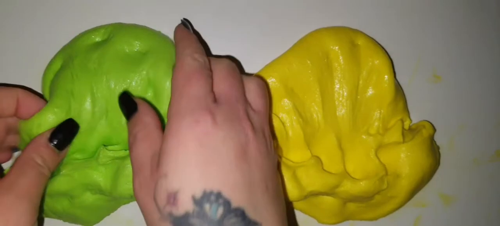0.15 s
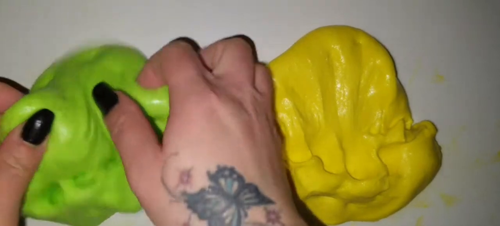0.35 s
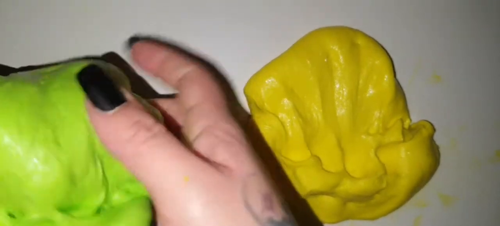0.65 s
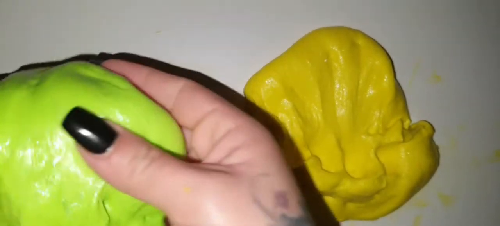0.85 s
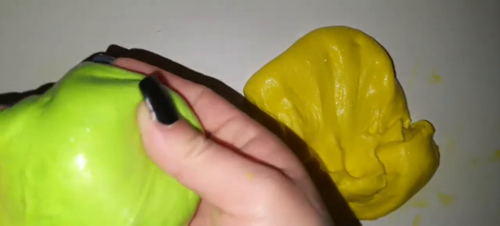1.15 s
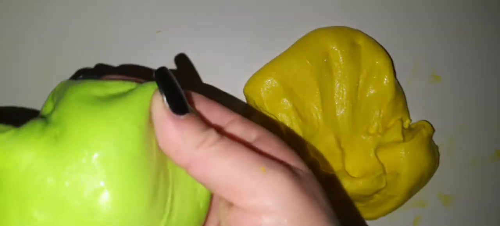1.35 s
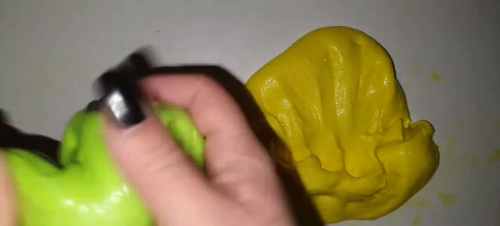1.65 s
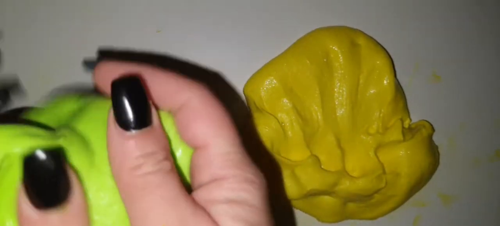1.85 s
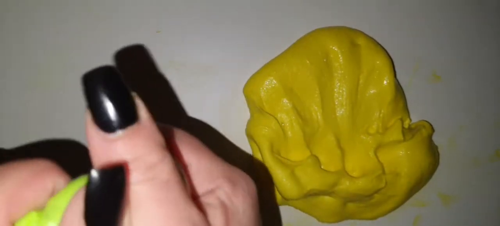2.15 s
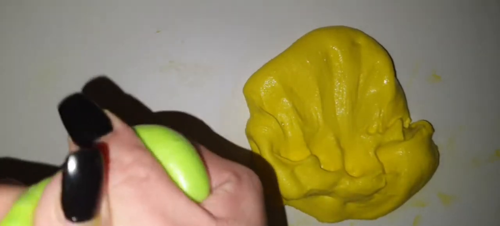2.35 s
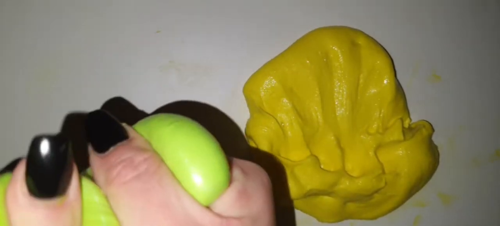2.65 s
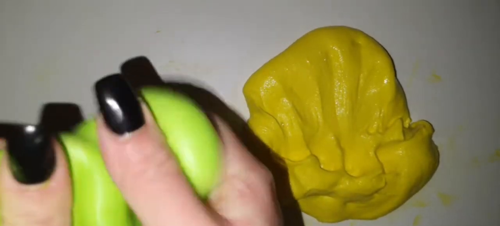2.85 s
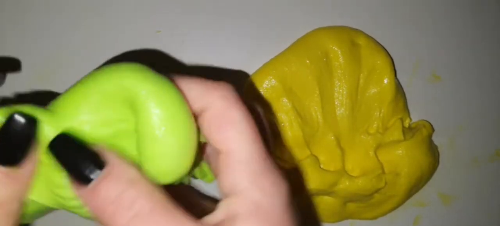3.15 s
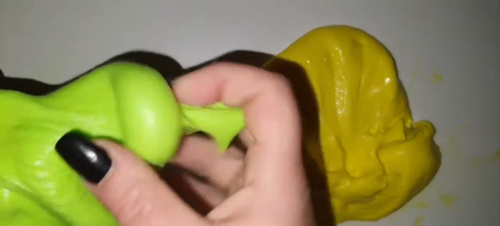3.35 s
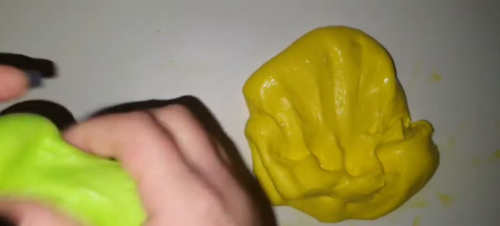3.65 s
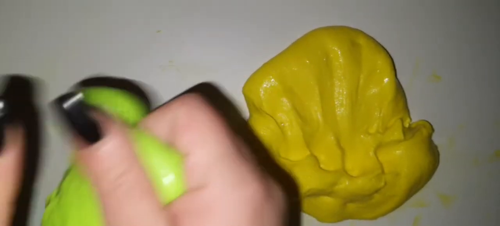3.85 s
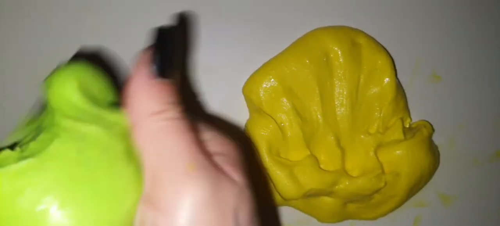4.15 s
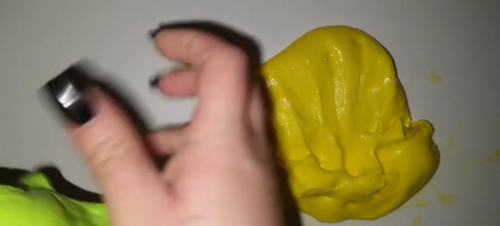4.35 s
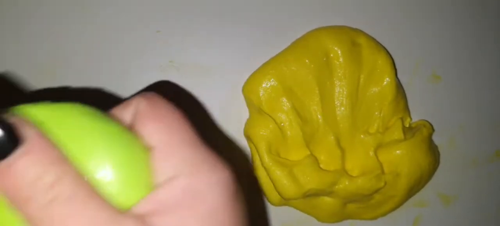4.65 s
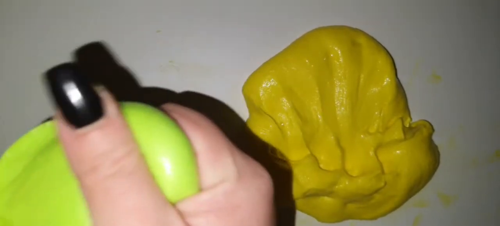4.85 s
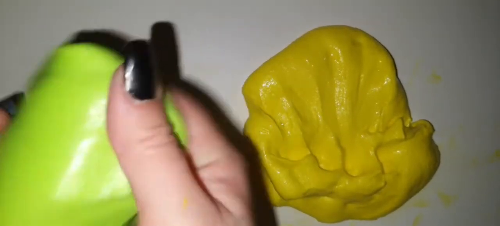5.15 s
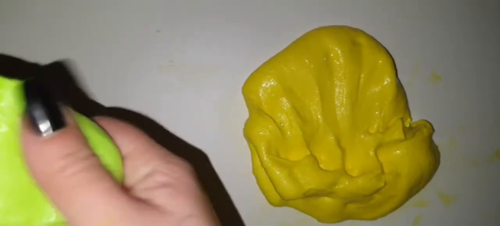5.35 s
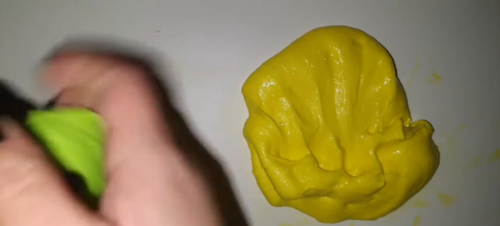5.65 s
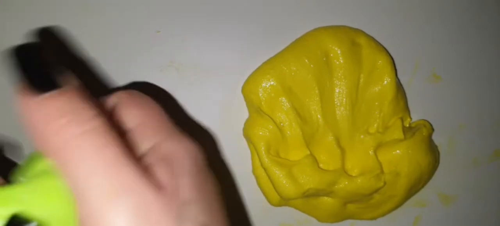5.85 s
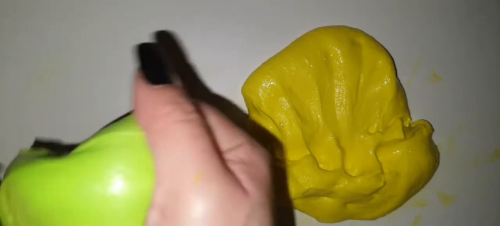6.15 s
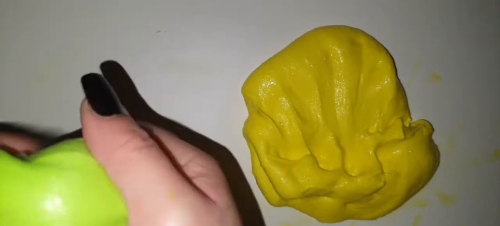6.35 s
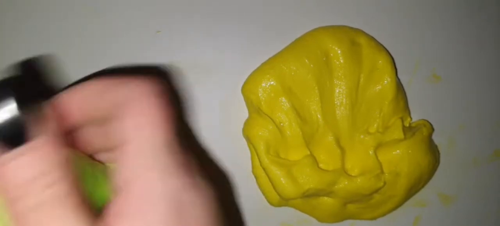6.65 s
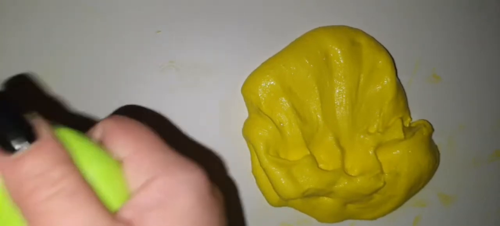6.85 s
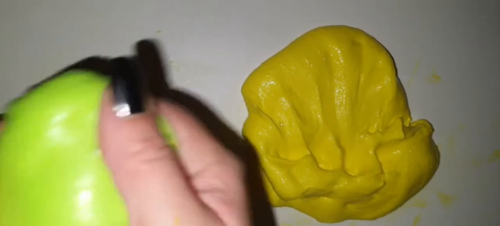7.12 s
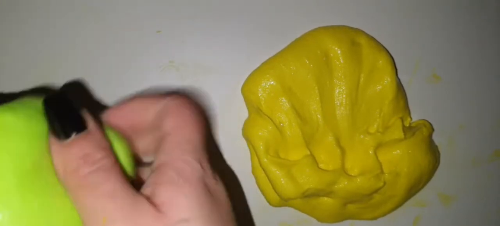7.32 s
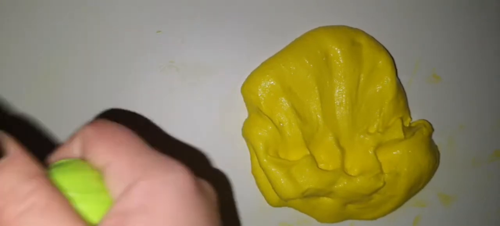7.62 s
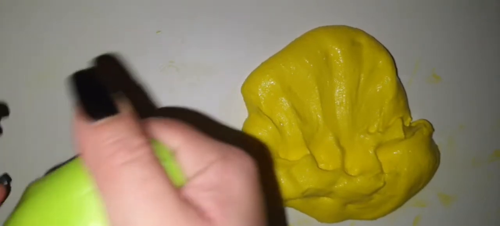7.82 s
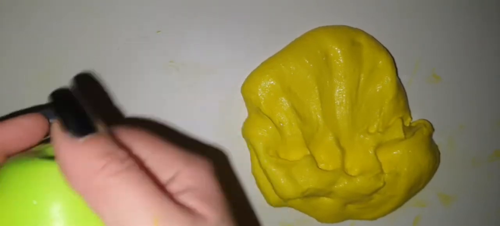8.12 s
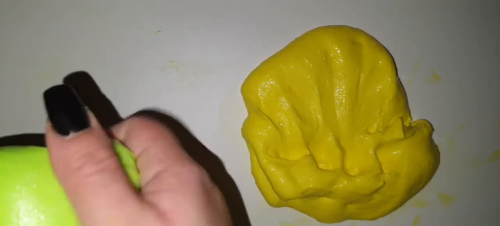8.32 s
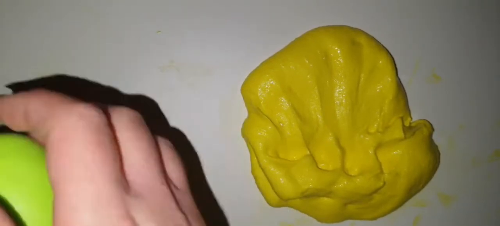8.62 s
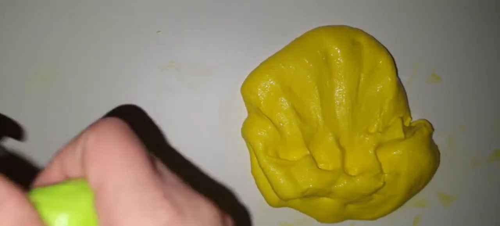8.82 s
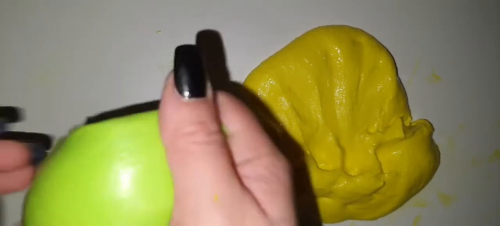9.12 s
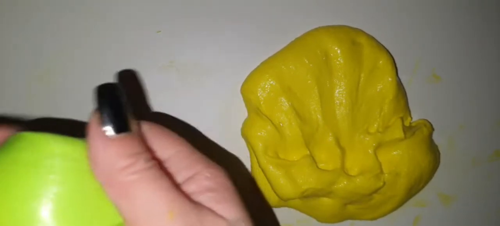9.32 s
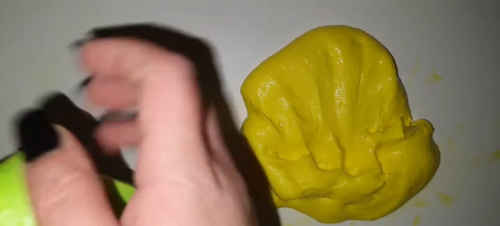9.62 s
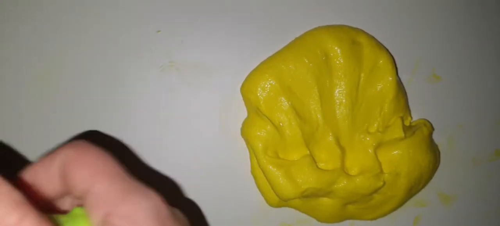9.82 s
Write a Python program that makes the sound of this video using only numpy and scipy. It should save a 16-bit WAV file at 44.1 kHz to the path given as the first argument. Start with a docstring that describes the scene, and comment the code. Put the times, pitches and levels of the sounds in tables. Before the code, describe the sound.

Hands knead a lump of dried slime up close: opening scuffs, soft hissing rubs, squishy squeezes, and a sharp burst of loud pops.

```python
"""A lump of dried slime scuffs and thuds over a table top, then two hands knead it.
The place is a quiet room, with a pair of microphones close to the hands, the left one nearer.
Each stroke swells and lets go: shaped friction noise makes the scuff, hiss, squish and cupped hollow.
Light rubs hiss through a closing gap between skin and slime; squeezes also squish and sound the hollow.
Trapped air leaves in sharp pops (noise flurries) and dull plops (sagging tones)."""
import sys
import numpy as np
from scipy import signal
from scipy.fft import rfft, irfft
from scipy.io import wavfile
from scipy.ndimage import uniform_filter1d

SR = 44100
rng = np.random.default_rng(int(sys.argv[2]) if len(sys.argv) > 2 else 0)


def store_wav(level_fs):
    """Save 16-bit WAV to argv[1]."""
    pcm = np.round(np.clip(np.atleast_2d(level_fs), -1, 1) * 32767)
    wavfile.write(sys.argv[1], SR, pcm.T.astype(np.int16))


N = 440114

# Low room rumble and microphone hiss: freq_hz, level_db_per_hz (relative)
AIR_COLOUR = [(10, -32), (28, -22.5), (62, -1), (92, 1.5), (190, -11), (380, -14.5), (750, -26.5),
              (4000, -33), (13000, -25.5), (16000, -38)]
# Decay of the room: freq_hz, t60_s
ROOM_DECAY = [(250, 0.25), (1800, 0.17), (8000, 0.27)]
# Thud of the table top: freq_hz, level_db_per_hz (relative)
THUD_COLOUR = [(15, -14), (40, -9), (75, 3), (130, -10), (300, -26), (1000, -70)]
# Lump scuffing over the table: freq_hz, level_db_per_hz (relative)
SCUFF_COLOUR = [(25, -21), (80, 1), (230, -11.5), (500, -4), (750, -10.5), (1150, 1.5), (1500, -6),
                (3000, -4.5), (4500, -7), (16000, -17.5)]
# Skin sliding over the slime: freq_hz, level_db_per_hz (relative)
SLIDE_COLOUR = [(2500, -6), (8000, -4), (10000, -3.5), (13000, 1.5), (16000, -0.3)]
# Squeezed slime: freq_hz, level_db_per_hz (relative)
SQUISH_COLOUR = [(120, -19), (600, -2), (850, -4), (1150, -5), (1900, -4), (2700, -7.5), (4000, -13.5),
                 (16000, -23.5)]
# Air in the cupped hands: freq_hz, level_db_per_hz (relative)
HOLLOW_COLOUR = [(40, -18), (210, -12.5), (290, -2.5), (335, 2.5), (400, -3.5), (500, -7.5), (850, -32.5),
                 (2000, -65.5)]
# Tearing skin of a pop: freq_hz, level_db_per_hz (relative)
SNAP_COLOUR = [(100, -32), (400, -3.5), (750, -15), (1250, -14), (1800, -5.5), (4000, -8.5), (9000, -11),
               (16000, -7.5)]

# Shoves of the lump over the table: peak_s, rise_s, fall_s, scuff_db, thud_db (before the stereo tilt)
SHOVES = [(0.103, 0.029, 0.042, -43.5, -52), (0.176, 0.051, 0.026, -44, -70), (.27, .05, 0.076, -60.5, -73),
          (.37, 0.043, 0.077, -50, -78), (.425, 0.023, 0.023, -42.5, -78)]
# Deep pockets collapsing: start_s, peak_db (before the bass cut and layer trim), settled_pitch_hz, swelling_s
PLOPS = [(2.2822, -12, 344, 0.0018), (2.382, -23, 301, 0.0057), (3.755, -28.5, 359, 0.00061),
         (4.328, -31, 490, 0.0011), (4.588, -33, 290, 0.0015), (4.675, -26, 291, 0.0014),
         (4.751, -29.5, 297, 0.00089), (4.782, -21.5, 297, 0.00073), (5.376, -31, 351, 0.0016),
         (5.398, -32.5, 384, 0.0025), (5.935, -28, 321, 0.0017), (6.415, -26.5, 317.4, 0.0049),
         (6.467, -28, 299, 0.0021), (6.886, -32.5, 373, 0.0024), (6.966, -42, 310, 0.0032),
         (8.372, -36.5, 350, 0.0027), (8.392, -29.5, 284, 0.0027), (9.453, -41, 383, 0.0025),
         (9.915, -27, 292, 0.0054)]
# Air pockets bursting through the dry skin:
# burst_s, level_db (rms over 20 ms), tearing_s, pitch_hz, left_minus_right_db (added to the chance spread)
POPS = [(0.0678, -48.5, 0.0018, 4640, -2), (.985, -64, 0.00095, 6200, 0), (1.967, -50, 0.00032, 9400, -1),
        (2.002, -54, 0.0014, 9000, 0), (2.0397, -41, 0.0022, 9000, 2), (2.068, -46.5, 0.00036, 13200, 5),
        (2.111, -48.5, 0.00049, 6840, 15), (2.1953, -44, 0.0019, 3160, -1.5),
        (2.231, -47, 0.0011, 13000, 0), (2.2567, -29.5, 0.00011, 10700, 10),
        (2.3047, -41.5, 0.0014, 12400, -4), (2.3197, -39, .0008, 13000, 2), (2.348, -42, 0.0017, 9000, 0),
        (2.3608, -46.5, 0.000042, 10400, 11), (2.372, -39, 0.00021, 9800, 17),
        (2.3811, -23.5, 0.0021, 4180, 0.5), (2.4004, -38, 0.002, 1690, 2),
        (2.4284, -20.5, 0.001, 6300, -1.5), (2.4349, -36, .0014, 6400, 12),
        (2.4804, -32, 0.00047, 3070, -1), (2.5175, -40.5, 0.0021, 7340, 4),
        (3.1393, -50.5, 0.0013, 8600, 4.5), (3.619, -44, 0.00043, 11130, 8), (3.78, -42, 0.0009, 13040, -3),
        (4.2715, -42.5, 0.00087, 12600, 0), (4.333, -39.5, 0.0014, 13500, -1),
        (4.4143, -49, 0.0015, 13000, 2), (4.668, -50, 0.00079, 2500, 2), (4.7514, -40, 0.0019, 3650, 3),
        (4.7829, -26, 0.001, 1450, 3.5), (5.266, -50, 0.001, 11100, -4), (5.2986, -50.5, 0.0017, 1580, 4),
        (5.301, -50, .0006, 13500, 0), (5.33, -45.5, 0.0015, 5870, -1), (5.365, -45.5, 0.0013, 14000, 7),
        (5.5723, -56.5, 0.0021, 12300, 12), (5.6133, -50.5, 0.00081, 9800, -1),
        (5.8303, -50.5, 0.001, 13400, 6), (5.9487, -42.5, 0.0019, 6460, 2),
        (6.89, -45.5, 0.00089, 14100, -7), (6.916, -41.5, 0.00053, 1400, 2),
        (7.2043, -48, 0.00066, 14200, 0), (7.2053, -56, 0.0011, 2600, 0), (7.272, -54.5, 0.0011, 6900, 2),
        (7.3931, -39.5, 0.0023, 5900, 3), (7.5717, -54.5, 0.00047, 11000, 4),
        (7.711, -42.5, 0.0014, 13900, 4), (7.906, -46, 0.0021, 11370, 0.5),
        (8.182, -57.5, 0.00045, 11000, -5), (8.246, -38, 0.00085, 14000, -4),
        (8.3592, -42, 0.00094, 8950, -7), (8.8645, -58, 0.0013, 6070, 4),
        (9.3317, -57.5, 0.00069, 12000, 2), (9.456, -53, .0008, 8960, 1), (9.789, -63, 0.0012, 7900, 7)]
# Squeezes: peak_s, rise_s, fall_s, sliding_db, squish_db, hollow_db (before the layer trims)
SQUEEZES = [(.955, .03, 0.038, -75, -70, -77), (1.63, 0.051, 0.025, -60.5, -63.5, -75),
            (1.769, 0.034, 0.09, -52, -58, -73.5), (2.09, .035, 0.057, -52.5, -70, -63),
            (2.3, 0.058, 0.036, -45.5, -53, -46), (2.44, .06, 0.088, -52.5, -51, -48),
            (2.621, 0.06, 0.019, -52.5, -63.5, -84), (2.871, 0.034, 0.052, -42, -50.5, -48),
            (2.97, 0.084, 0.046, -46.5, -51.5, -55), (3.034, 0.016, 0.02, -60.5, -64.5, -49),
            (3.37, 0.039, .08, -70, -74, -73.5), (3.783, 0.047, 0.038, -46, -48.5, -44),
            (4.33, 0.042, 0.047, -46.5, -48, -52), (4.59, 0.019, 0.021, -47, -52.5, -48.5),
            (4.679, 0.037, 0.061, -47, -59.5, -47.5), (4.801, .04, 0.046, -45.5, -52, -48.5),
            (5.05, .035, 0.059, -50.5, -68.5, -58.5), (5.321, 0.044, 0.069, -50.5, -65, -60.5),
            (5.39, 0.017, 0.032, -51, -60, -47.5), (5.463, .04, 0.031, -48, -49, -46),
            (5.94, 0.056, 0.069, -45.5, -61.5, -46), (6.135, 0.027, .022, -57.5, -66.5, -68),
            (6.279, .03, 0.034, -55.5, -73, -59.5), (6.345, 0.031, 0.012, -82, -95, -57.5),
            (6.418, .035, 0.021, -52.5, -61, -49), (6.49, .025, 0.026, -43, -51, -44),
            (6.771, 0.017, 0.026, -55, -60.5, -54.5), (6.911, .045, 0.031, -42.5, -53, -47.5),
            (6.971, 0.022, 0.013, -49.5, -54.5, -42.5), (7.17, 0.054, 0.045, -73, -89, -66),
            (7.321, 0.051, 0.027, -51, -54, -47.5), (7.407, 0.024, 0.022, -51.5, -65, -53.5),
            (7.521, 0.046, .03, -57, -70, -58), (7.63, 0.018, 0.043, -74, -93, -63),
            (7.702, .025, 0.045, -48.5, -61.5, -52), (7.79, .035, 0.05, -56, -64.5, -70.5),
            (8.258, 0.019, 0.035, -59, -60.5, -58.5), (8.387, 0.035, 0.037, -50.5, -52.5, -42),
            (8.71, 0.026, 0.076, -58.5, -82.5, -62), (8.918, .042, 0.028, -51.5, -57, -52),
            (9.21, 0.0257, 0.033, -66.5, -66.5, -70), (9.465, 0.033, 0.048, -50.5, -54.5, -45),
            (9.61, 0.028, 0.052, -58.5, -73, -57), (9.926, .031, 0.031, -45.5, -52.5, -49)]
# Light rubs of the fingers: peak_s, rise_s, fall_s, sliding_db (before the layer trim), gap_resonance_hz
RUBS = [(.433, .017, .015, -45, 4960), (.54, .05, .07, -68.5, 4570), (.72, 0.029, .03, -61, 5000),
        (0.809, 0.044, 0.027, -61, 5500), (.97, .05, 0.04, -61, 5490), (1.555, 0.047, 0.067, -58, 5200),
        (1.63, .03, 0.028, -55.5, 5100), (1.97, 0.15, 0.26, -58, 2987), (2.58, .06, 0.071, -57, 3940),
        (3.22, 0.12, 0.16, -70.5, 4000), (3.353, 0.053, 0.091, -58.5, 4760), (3.65, 0.19, .06, -60.5, 3920),
        (4., .08, .08, -68.5, 5340), (4.25, .1, .11, -54, 4260), (4.52, 0.045, .05, -60, 4800),
        (4.949, .1, 0.12, -53.5, 3680), (5.2, 0.14, .12, -58, 3880), (5.7, .15, .15, -63.5, 4690),
        (6.11, 0.12, .07, -55, 3520), (6.719, .035, .05, -52.5, 4070), (7.148, .055, .12, -55, 2780),
        (7.8, 0.067, 0.054, -51, 2794), (8.07, .08, 0.06, -56.5, 3390), (8.69, .07, 0.037, -52, 3100),
        (9.19, 0.055, .09, -62.5, 2860), (9.38, 0.034, 0.079, -60.5, 5100), (9.718, .055, .06, -53.5, 2640)]

AIR_DB = -68.5
MIC_LAG_S = .00016  # the hands are nearer to the left microphone
BAND_EDGE_HZ = 16100
CONTROL_HZ = 1000  # steps per second of the stroke curves
# a grip lies STROKE_DB below its peak one rise time before it and one fall time after it
STROKE_DB, RISE_CURVE, FALL_CURVE = -9.5, 1.385, 1.184
SKIN_FOLLOW = 0.63  # in a squeeze the hiss grows more gently with the grip than the squish does
RUB_SQUISH_DB, RUB_HOLLOW_DB = -20.5, -16  # a rub barely presses: both relative to its hiss
HOLD_DB = -82.5  # skin creeping over the lump between strokes, before the layer trim
# the gap between skin and slime closes during each stroke, and its resonance falls
SQUEEZE_GAP_HZ, GAP_OCTAVES_PER_S = 3100, 7
GAP_RANGE_OCTAVES = 0.62  # limit of the glide to either side of the peak's resonance


def gain_of(db):
    """Decibels to amplitude."""
    return 10 ** (np.asarray(db) / 20)


def evened(x):
    """Scales to rms 1 over all channels."""
    return x / np.sqrt(np.mean(x ** 2) + 1e-20)


def read(points, hz):
    """Reads a table on a log-frequency axis."""
    f, value = np.transpose(points)
    return np.interp(np.log(hz + 1), np.log(f + 1), value)


def add(mix, s, sound):
    """Mixes a sound in at time s."""
    part = mix[..., max(round(s * SR), 0):][..., :sound.shape[-1]]
    part += sound[..., :part.shape[-1]]


def coloured(x, points):
    """Gives a full-length signal a spectrum, at rms 1."""
    gain = gain_of(read(points, np.fft.rfftfreq(N, 1 / SR)))
    return evened(irfft(rfft(x) * gain, N))


def causal(db):
    """The minimum-phase ring: the most compact one with this spectrum."""
    log_gain = irfft(np.log(gain_of(db)))
    half = len(log_gain) // 2
    log_gain[1:half] *= 2
    log_gain[half + 1:] = 0
    return irfft(np.exp(rfft(log_gain)))


def microphones(near, scattered, apart):
    """Two microphones share the direct sound, the right one later, and differ in the scattered part."""
    apart = np.clip(apart, 0, 1)
    delay = np.exp(-2j * np.pi * np.fft.rfftfreq(N, 1 / SR) * MIC_LAG_S)
    late = irfft(rfft(near) * delay, N)
    return np.sqrt(1 - apart) * np.array([near, late]) + np.sqrt(apart) * scattered


def air():
    """Low room rumble and faint microphone hiss, as steady shaped noise."""
    shared, left, right = coloured(rng.standard_normal((3, N)), AIR_COLOUR)
    return gain_of(AIR_DB) * microphones(shared, np.array([left, right]), apart=0.63)


def room(x, wet_db=-6, wall_db=-11, wall_s=0.0087, bass_db=-7, treble_db=-3):
    """A scattered bounce from the nearest wall, with a short bright tail."""
    noise = rng.standard_normal((2, SR // 2)) * (rng.random((2, SR // 2)) < .2)
    hz, t, z = signal.stft(noise, SR, nperseg=256)
    decay = gain_of(-60 * t / read(ROOM_DECAY, hz)[:, None])
    tail = signal.istft(z * decay, SR, nperseg=256)[1]
    t = np.arange(tail.shape[1]) / SR
    tail *= np.clip(t / 0.00047 - .5, 0, 1)
    bounce = (t > wall_s) * np.exp(-abs(t - wall_s) / 0.0014) * rng.standard_normal(tail.shape)
    echo = gain_of(wet_db) * tail / np.linalg.norm(tail[0])
    echo += gain_of(wall_db) * bounce / np.linalg.norm(bounce[0])
    wet = signal.fftconvolve(x, echo, axes=1)[:, :N]
    # so close to the hands, the direct bass and top treble outweigh the room
    tone = [(400, bass_db), (1500, 0.061), (7000, 0.0055), (15000, treble_db)]
    return irfft(rfft(wet) * gain_of(read(tone, np.fft.rfftfreq(N, 1 / SR))), N)


def since(peaks):
    """Seconds since each stroke's peak: strokes x control steps."""
    return np.arange(0, N / SR, 1 / CONTROL_HZ) - peaks[:, None]


def grip_db(peaks, rise, fall):
    """Each stroke swells to its peak and lets go."""
    t = since(peaks)
    swell = np.maximum(-t / rise[:, None], 0)
    release = np.maximum(t / fall[:, None], 0)
    return STROKE_DB * (swell ** RISE_CURVE + release ** FALL_CURVE)


def together(*strokes_db):
    """The power sum of overlapping strokes, as a gain for every sample."""
    strength = np.linalg.norm(gain_of(np.vstack(strokes_db)), axis=0)
    return np.interp(np.arange(N) / SR, np.arange(len(strength)) / CONTROL_HZ, strength)


def table():
    """The table top thuds, as low noise, while the hands lean into each shove."""
    peaks, rise, fall, _, db = np.transpose(SHOVES)
    thud = coloured(rng.standard_normal(N), THUD_COLOUR)
    return together(db[:, None] + grip_db(peaks, rise, fall)) * thud


def friction(colour, slips_per_s, spread_db, grainy, judder_db, apart):
    """Tiny slips of uneven size over a smooth rub; the grip judders as it sticks and lets go."""
    sizes = gain_of(spread_db * np.minimum(rng.exponential(1, (3, N)), 5))
    sizes *= rng.choice([-1, 1], (3, N))
    slips = evened(sizes * (rng.random((3, N)) < slips_per_s / SR))
    grainy = np.clip(grainy, 0, 1)
    smooth = rng.standard_normal((3, N))
    rub = coloured(np.sqrt(grainy) * slips + np.sqrt(1 - grainy) * smooth, colour)
    judder_colour = [(5, -23), (25, 0.5), (110, -10.0), (400, -43.5), (2000, -105)]
    judder = coloured(rng.standard_normal(N), judder_colour)
    return evened(microphones(rub[0], rub[1:], apart) * gain_of(judder_db * judder))


def creased(x, patchy_db):
    """Shifting folds of the surface favour ever-changing patches of the spectrum."""
    z = signal.stft(x, SR, nperseg=512, noverlap=384)[2]
    patches = rng.standard_normal(z.shape[1:])
    for _ in range(2):
        patches = uniform_filter1d(patches, size=6, axis=0)  # over frequency
        patches = uniform_filter1d(patches, size=11, axis=1)  # over time
    z = z * gain_of(patchy_db * evened(patches))
    return signal.istft(z, SR, nperseg=512, noverlap=384)[1][:, :N]


def drag():
    """The lump scuffs over the table top in a few shoves, as grainy friction noise."""
    peaks, rise, fall, db, _ = np.transpose(SHOVES)
    scuff = friction(SCUFF_COLOUR, slips_per_s=640, spread_db=1.5, grainy=0.23, judder_db=2.5, apart=0.52)
    scuff = evened(creased(scuff, patchy_db=3))
    return together(db[:, None] + grip_db(peaks, rise, fall)) * scuff


def crackle(sliding):
    """Tiny surface bubbles tick one by one, more often and louder while the slime is worked."""
    ticks_per_s, spread_db, level_db = 24, 4, -68  # the rate holds where work is 1
    work = evened(np.sqrt(sliding))
    sizes = gain_of(spread_db * np.minimum(rng.exponential(1, N), 3))
    sizes *= rng.random(N) < work * ticks_per_s / SR
    ticks = coloured(sizes * work, [(1500, -17.5), (7000, -7.5), (16000, -1.0)])
    return gain_of(level_db) * np.array([ticks, np.roll(ticks, round(MIC_LAG_S * SR))])


def plops(faint_t60=0.091, palm_hz=291, palm_t60=0.21, palm_db=-12, sag=.22, sag_s=0.0045):
    """A collapsing pocket rings at a pitch that sags as it opens, and leaves the cupped hands humming."""
    out, t = np.zeros(N), np.arange(SR // 5) / SR
    for s, db, pitch, swelling in PLOPS:
        turns = np.cumsum(pitch * (1 + sag * np.exp(-t / sag_s))) / SR
        # the louder the plop, the sooner its pocket dies
        decay_db = -60 * t / faint_t60 * (1 + gain_of(db + 16))
        pocket = gain_of(decay_db) * np.sin(2 * np.pi * turns)
        palms = gain_of(palm_db - 60 * t / palm_t60) * np.sin(2 * np.pi * palm_hz * t)
        plop = (pocket + palms) * (1 - np.exp(-(t / swelling) ** 2))
        add(out, s, gain_of(db) * plop / abs(plop).max())
    # so small a pocket radiates no deep bass
    out = signal.sosfilt(signal.butter(2, 210, "highpass", fs=SR, output="sos"), out)
    return gain_of(-9.5) * np.array([out, out])


def pops(peak_db=8, octaves=0.85, skirt_db=4, crack=0.42, apart=1.0):
    """The skin tears in a brief flurry around one sharp crack; the opened pocket colours both."""
    out, t = np.zeros((2, N)), np.arange(-512, 512) / SR
    hz = np.fft.rfftfreq(512, 1 / SR)
    for s, db, tearing, pitch, pan_db in POPS:
        envelope = np.exp(np.where(t < 0, 2 * t, -t) / tearing)
        flurry = envelope * rng.standard_normal((3, len(t)))
        flurry /= np.linalg.norm(flurry, axis=1, keepdims=True)
        # the quicker the tear, the more of it goes into the crack
        direct = flurry[0] + crack * np.exp(-tearing / 0.0005) * (t == 0)
        pair = np.array([direct, np.roll(direct, round(MIC_LAG_S * SR))]) + apart * flurry[1:]
        pocket_db = peak_db * np.exp(-.5 * (np.log2((hz + 1) / pitch) / octaves) ** 2)
        # a small pocket radiates little bass
        pocket_db -= skirt_db * np.clip(np.log2(pitch / (hz + 1)), 0, 3)
        ring = causal(read(SNAP_COLOUR, hz) + pocket_db)
        pop = signal.fftconvolve(pair, ring[None], axes=1)
        pop *= gain_of([[pan_db / 2], [-pan_db / 2]])
        pop /= np.sqrt(np.sum(pop ** 2) / (2 * .02 * SR))  # rms 1 over 20 ms in two channels
        add(out, s + t[0], gain_of(db) * pop)
    return out


def bubbles(count=30):
    """Wet pockets of many sizes burst in the slime, each ringing for a few cycles."""
    per_s, cycles = 500, 3  # bursts of all sizes together; cycles of ring per decay constant
    out, t = np.zeros((2, N)), np.arange(1500) / SR
    for hz in np.geomspace(1700, 5500, count):
        ring = np.exp(-t * hz / cycles) * np.sin(2 * np.pi * hz * t) / np.sqrt(hz)
        for when, left, right in rng.random((round(per_s / count * N / SR), 3)):
            add(out, when * N / SR, np.array([[left], [right]]) ** 2 * ring)
    return evened(out)


def through_gap(x, gap_hz, leak_db=-24):
    """The gap passes hiss above its resonance and whistles faintly at it."""
    hz, t, z = signal.stft(x, SR, nperseg=512, noverlap=384)
    sharpness = 1.35
    ratio = hz[:, None] / np.interp(t, np.arange(len(gap_hz)) / CONTROL_HZ, gap_hz)
    gain = ratio ** 4 / ((1 - ratio ** 2) ** 2 + (ratio / sharpness) ** 2) + gain_of(leak_db)
    gain /= np.sqrt(np.mean(gain ** 2, axis=0))
    return signal.istft(z * gain, SR, nperseg=512, noverlap=384)[1][:, :N]


def gap_resonance(peaks, peak_hz, skin_db):
    """The resonance glides down through each stroke; overlapping strokes are averaged by power."""
    octaves = np.clip(-GAP_OCTAVES_PER_S * since(peaks), -GAP_RANGE_OCTAVES, GAP_RANGE_OCTAVES)
    power = gain_of(skin_db) ** 2 + 1e-30
    return np.average(peak_hz[:, None] * 2 ** octaves, axis=0, weights=power)


def hands():
    """Squeezes and rubs set the strength of hiss, squish and hollow, and the resonance of the gap."""
    squeezed, rise, fall, skin_db, squish_db, hollow_db = np.transpose(SQUEEZES)
    grip = grip_db(squeezed, rise, fall)
    rubbed, rise, fall, rub_db, rub_gap_hz = np.transpose(RUBS)
    rub = rub_db[:, None] + grip_db(rubbed, rise, fall)
    skin = np.vstack([skin_db[:, None] + SKIN_FOLLOW * grip, rub])
    squeeze_gap_hz = np.full(len(squeezed), SQUEEZE_GAP_HZ)
    sliding = np.hypot(together(skin), gain_of(HOLD_DB))
    squishing = together(squish_db[:, None] + grip, rub + RUB_SQUISH_DB)
    cupping = together(hollow_db[:, None] + grip, rub + RUB_HOLLOW_DB)
    gap_hz = gap_resonance(np.r_[squeezed, rubbed], np.r_[squeeze_gap_hz, rub_gap_hz], skin)
    return sliding, squishing, cupping, gap_hz


def kneading(sliding, squishing, cupping, gap_hz):
    """Skin slides, the squeezed slime crackles, and the air between the palms resounds."""
    slide = friction(SLIDE_COLOUR, slips_per_s=1100, spread_db=1.0, grainy=0.75, judder_db=2.5, apart=0.89)
    slide = evened(creased(through_gap(slide, gap_hz), patchy_db=1.8))
    squish = friction(SQUISH_COLOUR, slips_per_s=800, spread_db=2.0, grainy=0.27, judder_db=3.5, apart=.8)
    squish = evened(creased(squish, patchy_db=3.5))
    squish = .88 * squish + .47 * bubbles()
    hollow = friction(HOLLOW_COLOUR, slips_per_s=290, spread_db=2.5, grainy=.5, judder_db=0.2, apart=0.023)
    squish_tilt = gain_of([[1.2], [-1.2]])  # louder on the left
    return (gain_of(0.5) * slide * sliding
            + gain_of(0.45) * squish * squishing * squish_tilt
            + gain_of(-2.5) * hollow * cupping)


def scene():
    """Hands and slime close to the microphones, with their room, the air and the table's thud."""
    sliding, squishing, cupping, gap_hz = hands()
    handling = drag() + kneading(sliding, squishing, cupping, gap_hz) + crackle(sliding)
    handling_tilt = gain_of([[.5], [-.5]])  # louder on the left
    slime = handling * handling_tilt + pops() + plops()
    return slime + room(slime) + air() + table()


def record(dry):
    """Full-scale clipping, then the band limit."""
    low_pass = signal.firwin(255, BAND_EDGE_HZ, window=("kaiser", 8), fs=SR)
    return signal.oaconvolve(np.clip(dry, -1, 1), low_pass[None], "same")


dry = scene()
out = record(dry)
store_wav(out)
```